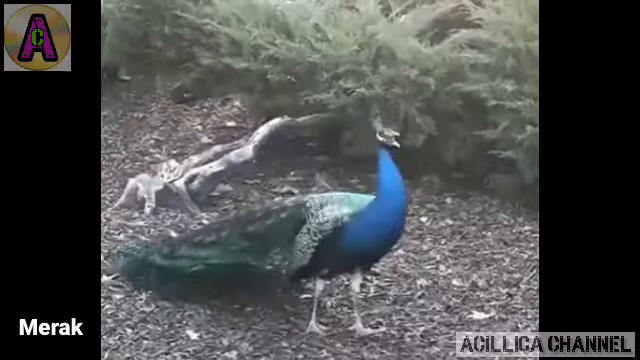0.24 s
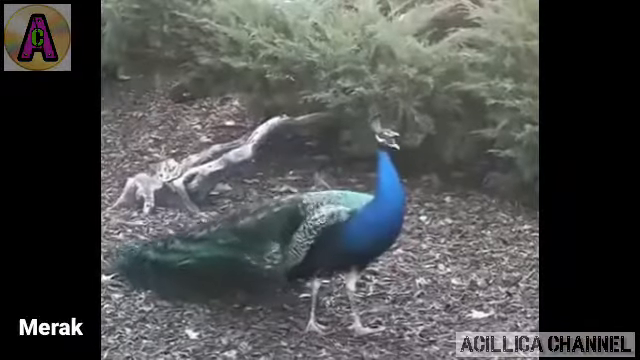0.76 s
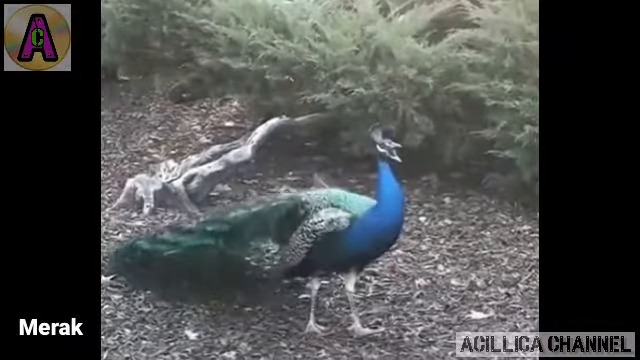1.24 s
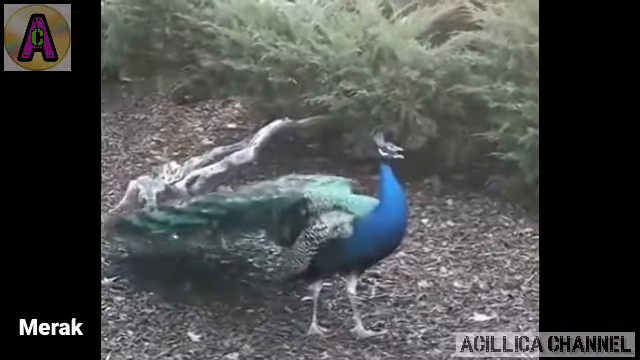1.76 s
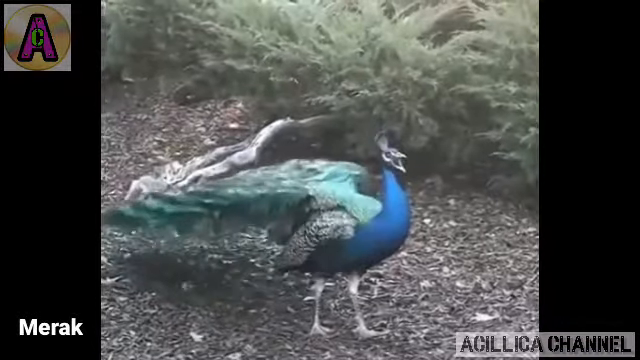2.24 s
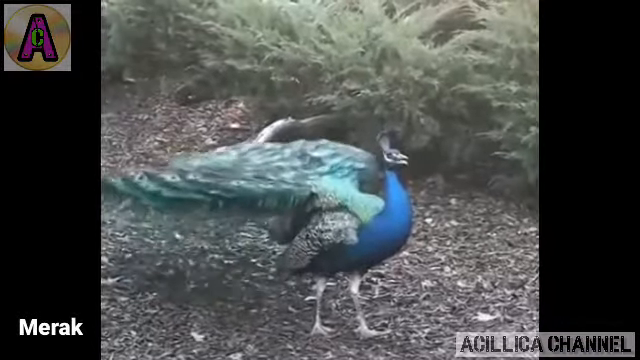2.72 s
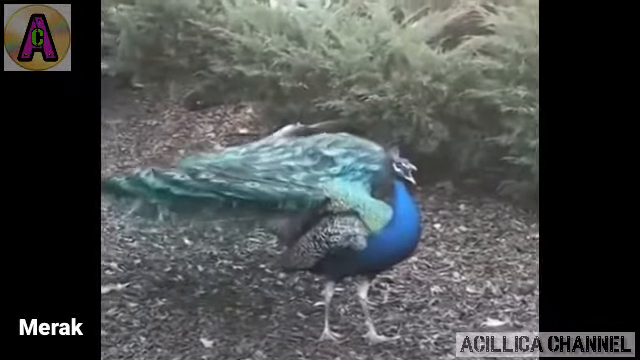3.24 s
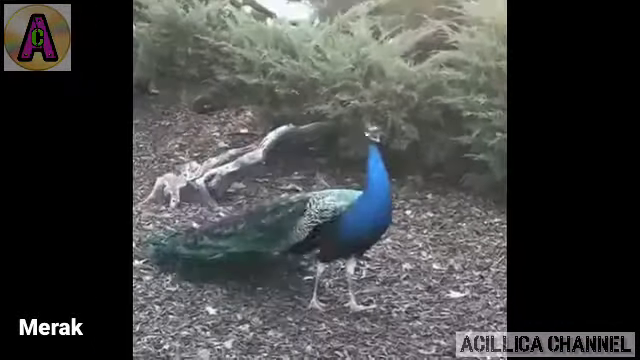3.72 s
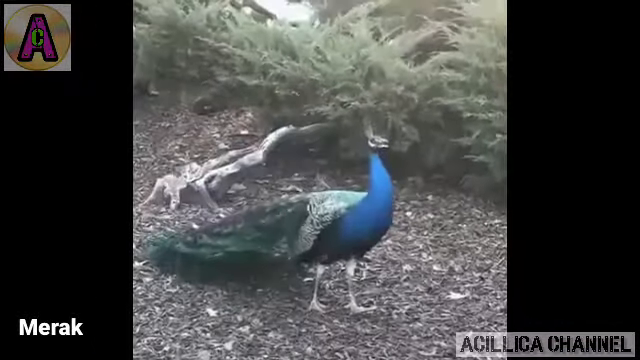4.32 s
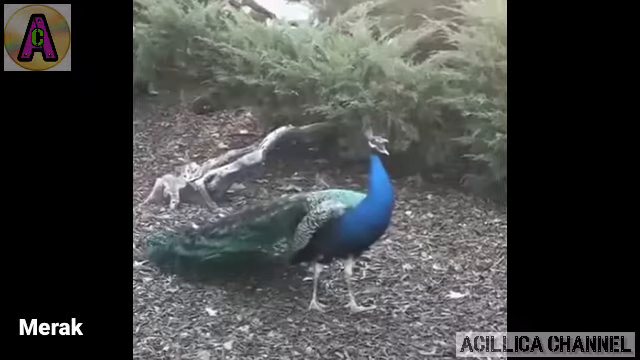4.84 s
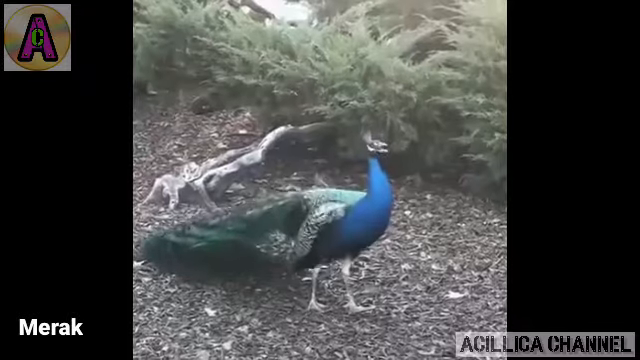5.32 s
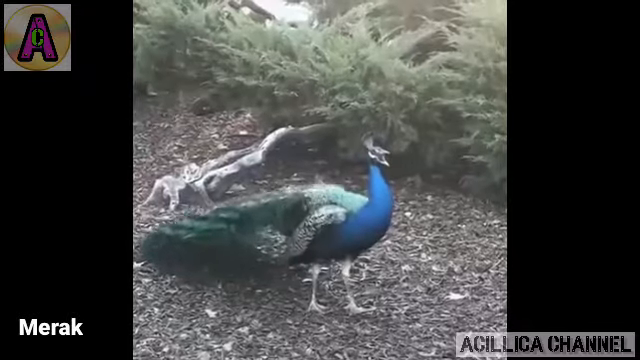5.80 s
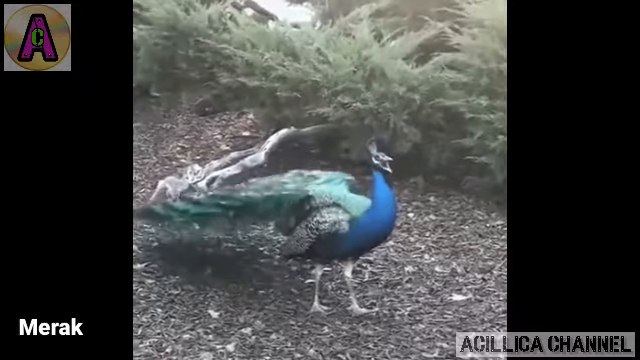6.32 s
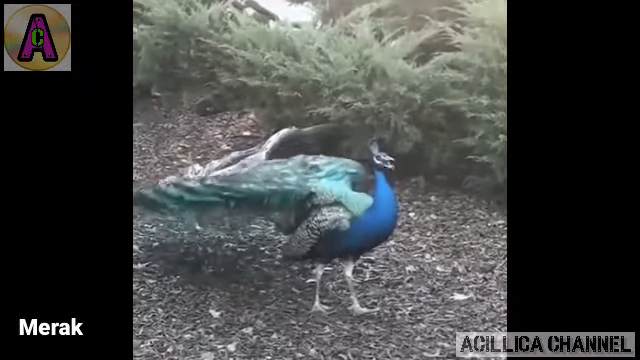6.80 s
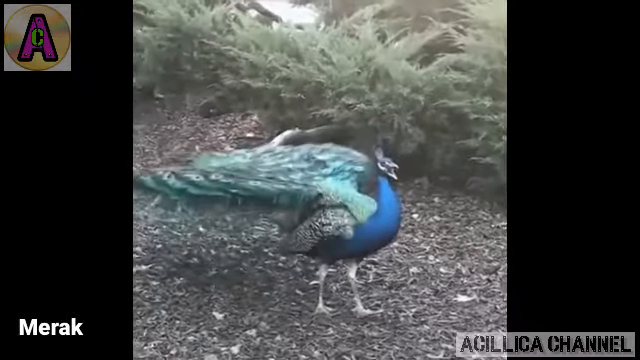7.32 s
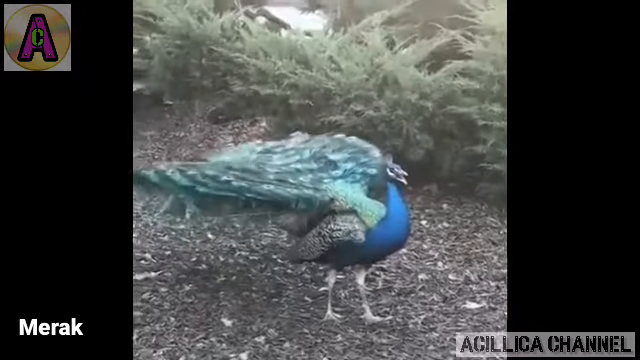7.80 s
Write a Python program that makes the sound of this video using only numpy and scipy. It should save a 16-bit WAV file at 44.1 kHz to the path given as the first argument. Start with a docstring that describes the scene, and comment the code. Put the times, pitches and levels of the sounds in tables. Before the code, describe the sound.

Loud honking peacock cries repeat nearby outdoors, echoing softly over low wind bumps and a faint hush.

```python
"""A thump of wind on the microphone, then a peacock calling close by in a garden: loud nasal arches
of pitch from its syrinx, shaped by throat and beak, raspy at both ends and clean and bright on top.
Distant shrubs throw back echoes and a soft tail. Behind the calls the breeze rumbles on the
microphone and a small bird chips far off, over an outdoor hush. The mono passage, which drops out
briefly and resumes in the middle of a call, plays round nearly twice."""
import sys
import numpy as np
from scipy import signal
from scipy.fft import rfft, irfft
from scipy.io import wavfile
from scipy.ndimage import uniform_filter1d

SR = 44100
rng = np.random.default_rng(int(sys.argv[2]) if len(sys.argv) > 2 else 0)


def waveform_to_disk(signal):
    """Save audio, clipped to [-1, 1], as 16-bit WAV at the path in sys.argv[1]."""
    frames = np.transpose(np.atleast_2d(signal))
    scaled = np.clip(frames, -1, 1) * 32767
    samples = np.round(scaled).astype(np.int16)
    wavfile.write(sys.argv[1], SR, samples)


N = 355181
PASSAGE_S, DROPOUT_START_S, DROPOUT_END_S = 4.34213, 3.713, 3.734
SIZE = round(PASSAGE_S * SR)
TIME = np.arange(SIZE) / SR
BINS = np.fft.rfftfreq(SIZE, 1 / SR)


# The peacock's calls, in the foreground: (start [s], length [s], attack [s], level [dB], fade [dB],
# top pitch [Hz], rise [s], sag [Hz], throat tuning [x], beak tuning [x], beak boost [dB],
# mid-call beak swell or pinch [dB], closing "ow" [dB], treble [dB], dulling over the call [dB])
CALLS = [(0.089, .600, 0.0078, -1.23, 3, 761.4, .124, 115.7, 1, .86, -8, 4.5, 4, 25, 1.6),
         (0.912, 0.54, 0.013, 1.77, 9, 764.8, .139, 110.6, 1.02, .92, -4, -12.5, 7, 24, .4),
         (1.719, 0.59, 0.019, 2, 12.5, 763.2, .172, 109.5, 1.003, 1, 2.34, -2.5, 0.5, 25, 1.2),
         (2.667, .650, 0.016, -0.23, 9.5, 764.8, .183, 127.6, 1.007, .99, 4, 4, -3, 26, 2.5),
         (3.402, .581, .01, 6, 9.5, 761.4, .15, 129.4, 0.942, 0.67, -10.5, 26.5, -4.5, 17.5, -9.5)]

def peacock():
    """The bird close to the microphone, before the garden answers."""
    out = np.zeros(SIZE)
    for row in CALLS:
        add(out, *call(*row))
    return out


# The beak opens and shuts alike in every call:
# (position [share of call], effort [dB], resonance before tuning [Hz], height before boost [dB])
BEAK_GESTURE = [(0, -3, 1430, 19), (.08, 0.5, 1542, 10), (.16, -1, 2340, 8.5), (.28, -4.5, 2500, 12.5),
                (.45, -6, 2670, 12.5), (.62, 0, 2614, 17), (.83, -2.5, 2316, 9), (1, 2, 1345, 6.5)]
# Resonances of windpipe and throat: (frequency before tuning [Hz], width [Hz], height [dB])
THROAT_RESONANCES = [(1904, 226, 12), (1998, 119, 4), (2214, 120, 10), (2457, 306, 24), (2851, 229, 24),
                     (3426, 219, 15)]

def call(start, length, attack_s, db, fade_db, top_hz, rise_s, sag_hz, throat_tuning, beak_tuning,
         boost_db, middle_db, ow_db, treble_db, dulling_db,
         edge_db=42, release_s=.012, dull_db_per_hz=.2034, hiss_edge_share=.39):
    """Onset and sound of one cry: breath drives the syrinx while the beak moves a resonance."""
    end = start + length
    cut = start < DROPOUT_END_S < end  # a call cut by the dropout is heard only after it
    t = np.arange(round((DROPOUT_END_S if cut else start) * SR), round(end * SR)) / SR
    share = (t - start) / length
    places, *columns = np.transpose(BEAK_GESTURE)
    effort_db, beak_hz, beak_db = (np.interp(share, places, c) for c in columns)
    pitch_hz = pitch_arch(t, start, length, top_hz, rise_s, sag_hz)
    edges_db = edge_db * (np.exp((start - t) / attack_s) + np.exp((t - end) / release_s))
    level_db = db + effort_db - fade_db * share - edges_db
    bright_db = treble_db - dulling_db * share - dull_db_per_hz * (top_hz - pitch_hz)
    if cut:  # the level recovers quickly, the treble more slowly
        level_db -= 12 * np.exp((t[0] - t) / .0073)
        bright_db -= 26 * np.exp((t[0] - t) / .011)
    beak_db += boost_db + middle_db * bell(share, centre=.46, spread=.11)
    resonances = [(throat_tuning * hz, width, height) for hz, width, height in THROAT_RESONANCES]
    resonances += [
        (beak_tuning * beak_hz, 875, beak_db),
        (3680, 480, 5.5 - 10.5 * share),  # upper-throat twang, dying away through the call
        (2690, 710, ow_db * bell(share, centre=.828, spread=.073))]  # the "ow", late in the fall
    voice = syrinx(t, level_db, pitch_hz, resonances, bright_db)
    breath_db = level_db + (1 - hiss_edge_share) * edges_db  # the air leads the tone and outlasts it
    return t[0], voice + breath(breath_db, top_hz - pitch_hz)


def pitch_arch(t, start, length, top_hz, rise_s, sag_hz, top_share=.412, scoop_hz=105.43, creep_hz=24.68):
    """Pitch in Hz: scoops up, creeps to its top, sags ever faster and drops as the air runs out."""
    age, left = t - start, start + length - t
    past_top = age / length - top_share
    catch = 72.65 * np.exp(-age / .028)
    scoop = scoop_hz * np.maximum(1 - age / rise_s, 0)
    creep = creep_hz * np.maximum(-past_top / top_share, 0)
    sag = sag_hz * np.maximum(past_top / (1 - top_share), 0) ** 2.31
    drop = 126 * np.exp(-left / .015)
    return top_hz - catch - scoop - creep - sag - drop


# Strength of the partials ahead of the resonances: (frequency [Hz], gain [dB])
SYRINX_SPECTRUM = [(580, -7.5), (760, -3), (1150, -4), (1500, -6.5), (2400, -20.5), (3800, -12),
                   (4400, -15.5), (4900, -23.5), (5400, -23.5), (6100, -20.5), (6900, -24), (7600, -31.5)]

def syrinx(t, level_db, pitch_hz, resonances, bright_db, shimmer_db=1.44, pulse_spread=.21, slack_hz=630):
    """Partials glide through the resonances; the slack syrinx rasps, the taut one rings clean."""
    settled = t > t[np.argmax(pitch_hz)]
    clean_hz = np.where(settled, 705, 765)  # once settled, the voice stays clean to a lower pitch
    slack = np.clip((clean_hz - pitch_hz) / (clean_hz - slack_hz), 0, 1)
    turns = np.cumsum(pitch_hz * (1 + .0009 * flutter(t, 40))) / SR
    turns += .005 * slack * flutter(t, 220)  # slack cycles come a little early or late
    hz = np.arange(1, 14)[:, None] * pitch_hz
    shape_db = read(SYRINX_SPECTRUM, hz) + sum(db * hump(hz, f, width) for f, width, db in resonances)
    shape_db += bright_db * np.clip((hz - 3000) / 2000, 0, 1)
    rolloff = np.clip((8400 - hz) / 800, 0, 1)
    partials = np.sqrt(2) * amp(level_db + shape_db) * rolloff
    voice = np.zeros(len(t))
    for k, partial in enumerate(partials, 1):
        angle = 2 * np.pi * k * turns + pulse_spread * k ** 2  # the windpipe spreads each sharp pulse
        # the low partials stay pure; the upper ones crack and falter
        rasp = flutter(t, 260) * np.cos(angle) + flutter(t, 390) * np.sin(angle)
        roughness = .0016 * k ** 2.5 * slack
        shimmer = amp((shimmer_db + .057 * k ** 2 * slack) * flutter(t, 57))
        voice -= partial * (shimmer * np.cos(angle) + roughness * rasp)
    return voice * signal.windows.tukey(len(t), .01)


# Air rushing through the syrinx: (frequency [Hz], relative density [dB])
BREATH_SPECTRUM = [(300, -32), (900, -3), (2500, 2.5), (3600, -0.5), (5000, -4.5), (7500, -15.5)]

def breath(level_db, below_top_hz, held_db=-34, slack_db=-18.5, slack_span_hz=130):
    """Turbulence of the cry: faint on the held note, harsh where the pitch is slack."""
    slack = np.clip(below_top_hz / slack_span_hz, 0, 1)
    air = noise(amp(read(BREATH_SPECTRUM, BINS)))[:len(slack)]
    return air * amp(level_db + held_db + (slack_db - held_db) * slack)


# Ground and shrubs near the microphone: (delay [s], gain [dB])
NEAR_REFLECTIONS = [(.0047, -24.5), (.0083, -33), (.0125, -26.5), (.0185, -25), (.026, -26), (.041, -43)]
# Distant walls of shrubs: (delay [s], gain before colouring [dB])
FAR_ECHOES = [(.09, -50), (.13, -51.5), (.176, -43.5), (.33, -52.5)]
# Colour of the echoes and tail from across the garden: (frequency [Hz], gain [dB])
FAR_COLOUR = [(600, -3.5), (1400, 6.5), (2300, 0.5), (3000, -7.5), (3700, -7.5), (4500, -9.5),
              (5500, -11.5), (7500, -18)]
# Decay among the trees: (frequency [Hz], time to fall 60 dB [s])
TAIL_DECAY = [(600, 4.9), (2300, 3), (4500, 4.5), (7500, 0.39)]

def garden(calls, scatter_s=.023, scatter_db=-15, tail_db=-52.5, build_s=.33, taps_per_s=3000):
    """Paths to the microphone: direct, off the ground, off mulch and twigs, and from far trees."""
    taps = rng.standard_normal(SIZE) * (rng.random(SIZE) < taps_per_s / SR)
    hz, t, spectra = signal.stft(taps * np.clip(TIME / build_s, 0, 1), SR, nperseg=256)
    decay = amp(-60 * t / read(TAIL_DECAY, hz)[:, None])
    tail = signal.istft(spectra * decay, SR, nperseg=256)[1][:SIZE]
    diffuse = amp(tail_db) * rfft(unit(tail)) / np.sqrt(SIZE)
    far = (diffuse + delayed(FAR_ECHOES)) * amp(read(FAR_COLOUR, BINS))
    scatter = amp(scatter_db) * rfft(unit(taps * np.exp(-TIME / scatter_s))) / np.sqrt(SIZE)
    scatter *= 1 - hump(BINS, 0, 9000)  # small things scatter mostly treble
    response = 1 + delayed(NEAR_REFLECTIONS) + scatter + far
    return irfft(rfft(calls) * response, SIZE) + foliage(calls)


# The calls as the leaves return them: (frequency [Hz], relative density [dB])
FOLIAGE_SPECTRUM = [(500, -14), (1000, -12), (1400, 1), (1700, -9), (2300, 4.5), (3000, -1.5), (3800, -12),
                    (5000, -18), (7500, -21)]

def foliage(calls, wash_db=-41, t60_s=1.44):
    """Restless leaves blur each cry into a toneless wash that swells with it and dies away."""
    keep = np.exp(-np.log(1e6) / (t60_s * SR))
    power = signal.lfilter([1 - keep], [1, -keep], calls ** 2)
    return amp(wash_db) * np.sqrt(power) * noise(amp(read(FOLIAGE_SPECTRUM, BINS)))


# Strength of the breeze at the microphone: (time [s], relative level [dB])
BREEZE = [(0.0, -38.5), (0.1, -44.5), (0.34, -48.5), (0.82, -44), (1.09, -48.5), (1.27, -56), (1.49, -52.5),
          (1.82, -44), (2.55, -48.5), (2.74, -51), (2.97, -63), (3.21, -52), (3.5, -42.5), (3.69, -42),
          (4.01, -50), (4.34, -41)]
# Its rumble on the diaphragm: (frequency [Hz], relative density [dB])
RUMBLE_SPECTRUM = [(12, -52.5), (20, -20), (43, -1.5), (65, 0.5), (97, -4.5), (162, -13), (222, -16),
                   (285, -22), (400, -31), (520, -53.5), (880, -120)]
# The strongest eddies to hit the microphone: (time [s], peak before the low cut [dB], frequency [Hz])
MICROPHONE_BUMPS = [(.048, -17, 68), (.614, -21.5, 70), (.8, -25.5, 80), (1.788, -26, 80), (1.882, -26, 65),
                    (1.986, -21.5, 50), (3.349, -25.5, 55), (3.619, -24, 65), (3.646, -18.5, 55),
                    (3.789, -22, 60), (4.259, -17.5, 72)]

def wind(rumble_gain_db=3, bump_cycles=.49, eddies_per_s=2.5, eddy_db=-33.5, eddy_hz=85, low_cut_hz=30):
    """Right on the microphone: rumble swells with the breeze and eddies push the diaphragm to and fro."""
    breeze = amp(rumble_gain_db + np.interp(TIME, *np.transpose(BREEZE)))
    out = breeze * noise(amp(read(RUMBLE_SPECTRUM, BINS)) * hump(BINS, 0, 1900))
    draws = rng.random((round(eddies_per_s * PASSAGE_S), 2))
    lesser_eddies = [(when * PASSAGE_S, eddy_db, eddy_hz * 2 ** (octave - .5)) for when, octave in draws]
    for s, db, hz in MICROPHONE_BUMPS + lesser_eddies:
        cycles = (TIME - s) * hz
        out += amp(db) * bell(cycles, 0, bump_cycles) * np.cos(2 * np.pi * cycles)
    # the microphone barely responds to the deepest part
    return signal.sosfiltfilt(signal.butter(2, low_cut_hz, "highpass", fs=SR, output="sos"), out)


# A small bird far from the microphone: (start [s], length [s], frequency [Hz], width [Hz], level [dB])
DISTANT_CHIPS = [(2.521, 0.15, 7767, 755.4, -58), (3.52, 0.048, 5750, 1400, -45),
                 (2.8, 0.1, 7290, 530, -60)]

def small_bird():
    """Faint, high chips in the distance, each a short swell of narrow hiss."""
    out = np.zeros(SIZE)
    for s, length, hz, width, db in DISTANT_CHIPS:
        swell = np.sin(np.pi * np.clip((TIME - s) / length, 0, 1))
        out += amp(db) * swell * noise(bell(BINS, hz, width / 2))
    return out


# Open air all round the microphone: (frequency [Hz], relative density [dB])
HUSH_SPECTRUM = [(60, -26.5), (200, 0), (350, -3), (600, -1.5), (1000, -4.5), (1400, -13), (1700, -11.5),
                 (2300, -13), (3000, -18), (4000, -23.5), (7500, -28)]

def hush(level_db=-53):
    """The steady outdoor noise behind everything."""
    return amp(level_db) * noise(amp(read(HUSH_SPECTRUM, BINS)))


def amp(db):
    """Decibels to gain."""
    return 10 ** (np.asarray(db) / 20)


def unit(x):
    """Scales to rms 1."""
    return x / np.sqrt(np.mean(abs(x) ** 2) + 1e-20)


def read(points, hz):
    """Reads a spectrum table on a log-frequency axis."""
    f, value = np.transpose(points)
    return np.interp(np.log(hz + 1), np.log(f + 1), value)


def add(mix, s, sound):
    """Adds a sound into the mix from time s."""
    part = mix[max(round(s * SR), 0):][:len(sound)]
    part += sound[:len(part)]


def hump(hz, centre_hz, width_hz):
    """Resonance curve of height 1."""
    return 1 / (1 + (2 * (hz - centre_hz) / width_hz) ** 2)


def bell(x, centre, spread):
    """Gaussian of height 1."""
    return np.exp(-((x - centre) / spread) ** 2)


def noise(gains):
    """A passage of noise with the given spectrum, rms 1."""
    return unit(irfft(rfft(rng.standard_normal(SIZE)) * gains, SIZE))


def flutter(t, rate_hz):
    """Smooth random wobble of rms about 1, for spans under a second."""
    lowpass = signal.butter(6, rate_hz, fs=SR, output="sos")
    return unit(signal.sosfilt(lowpass, rng.standard_normal(SR)))[-len(t):]


def delayed(paths):
    """Frequency response of a set of (delay [s], gain [dB]) sound paths."""
    return sum(amp(db) * np.exp(-2j * np.pi * BINS * delay) for delay, db in paths)


def scene():
    """The garden from one microphone position, with the dropout, looped and alike in both channels."""
    passage = garden(peacock()) + wind() + small_bird() + hush()
    passage *= (TIME < DROPOUT_START_S) | (TIME > DROPOUT_END_S)
    return np.tile(np.resize(passage, N), (2, 1))


def record(dry, bass_hz=300, threshold_db=-26, ceiling=.94, edge_hz=7620):
    """Fast gain control holds down all above the bass, the peaks are rounded off and the top is cut."""
    bass = signal.sosfiltfilt(signal.butter(2, bass_hz, fs=SR, output="sos"), dry)
    upper = dry - bass
    power = uniform_filter1d(uniform_filter1d(upper[0] ** 2, 300), 300)  # two 7 ms averages
    over_db = np.maximum(10 * np.log10(abs(power) + 1e-12) - threshold_db, 0)
    held = bass + upper * amp(-over_db / 2)  # 2:1 compression
    rounded = held / (1 + (held / ceiling) ** 12) ** (1 / 12)
    band_limit = signal.firwin(1023, edge_hz, window=("kaiser", 8), fs=SR)
    return signal.oaconvolve(rounded, band_limit[None], "same")


dry = scene()
out = record(dry)
waveform_to_disk(out)
```